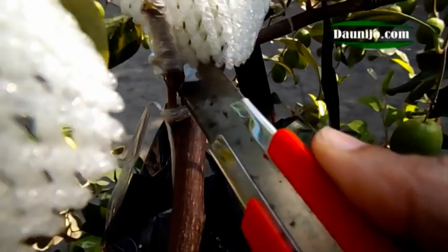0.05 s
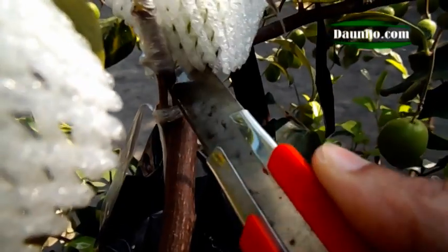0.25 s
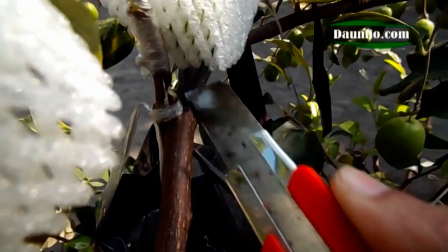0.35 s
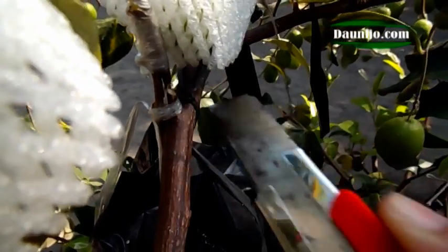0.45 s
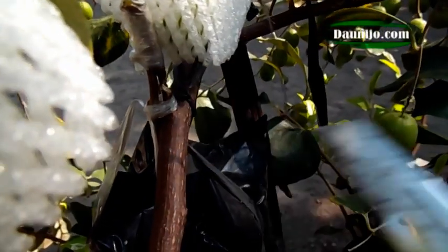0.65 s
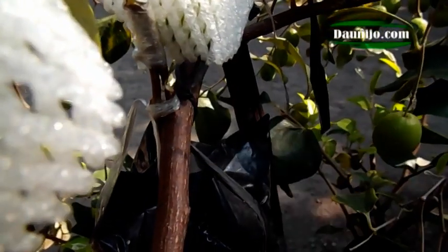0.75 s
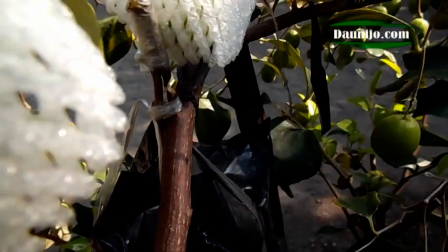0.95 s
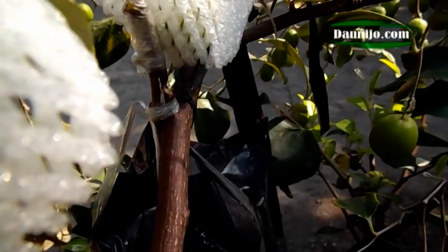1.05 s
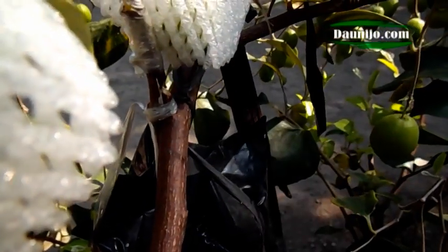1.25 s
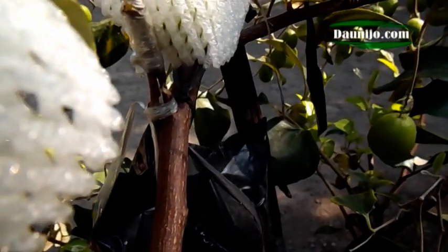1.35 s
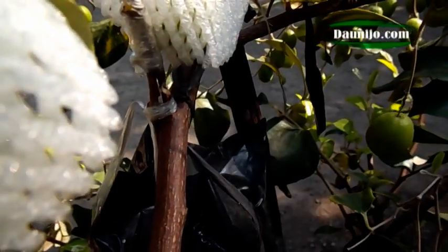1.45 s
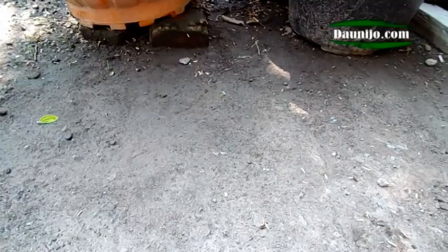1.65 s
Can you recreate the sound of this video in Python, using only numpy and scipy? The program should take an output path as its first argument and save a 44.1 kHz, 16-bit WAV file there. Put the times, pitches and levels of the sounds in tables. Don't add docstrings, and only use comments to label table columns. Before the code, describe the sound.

Pruning shears snip once through a woody stem, sharp metallic crunch, faint birds and leaves behind

```python
import sys
import numpy as np
from scipy import signal
from scipy.fft import rfft, irfft, next_fast_len
from scipy.io import wavfile
from scipy.ndimage import map_coordinates

SR = 44100
rng = np.random.default_rng(int(sys.argv[2]) if len(sys.argv) > 2 else 0)


def unload_audio(sound):
    columns = np.transpose(np.atleast_2d(sound))
    steps = np.round(np.clip(columns, -1, 1) * 32767)
    wavfile.write(sys.argv[1], SR, steps.astype(np.int16))


def rack_gain(trim_db):
    fader = np.asarray(trim_db, float)
    return 10 ** (fader / 20)


N = 74970


def unit(x):
    return x / np.sqrt(np.mean(x ** 2) + 1e-20)


def along(points, hz):
    f, v = np.transpose(points)
    return np.interp(np.log(hz + 1), np.log(f + 1), v)


def filtered(x, response):
    m = next_fast_len(x.shape[-1] + 4096)
    spectrum = rfft(x, m) * response(np.fft.rfftfreq(m, 1 / SR))
    return irfft(spectrum, m)[..., :x.shape[-1]]


def bell(centre_hz, octaves):
    return lambda hz: np.exp(-2 * (np.log2((hz + 1) / centre_hz) / octaves) ** 2)


def wobble(rate):
    knots = rng.standard_normal(int(N * rate / SR) + 4)
    return map_coordinates(knots, [np.arange(N) * rate / SR])


def window(start, length, edge):
    t = np.arange(N) / SR - start
    return np.clip(np.minimum(t, length - t) / edge + .5, 0, 1) ** 2


def echo(x, t60, count=1):
    t = np.arange(SR // 3) / SR
    tail = rng.standard_normal((count, len(t))) * rack_gain(-60 * t / t60) * (t > .002)
    return signal.fftconvolve(x[None], tail / np.linalg.norm(tail[0]), axes=1)[:, :N]


def hiss():
    # frequency in Hz, spectral level in dB per Hz.
    spectrum = [(15, -37), (25, -25), (496, -1), (569, -5.5), (652, -2.5), (858, -3.5), (1900, -8),
                (16100, -18.5), (17500, -21)]
    # frequency in Hz, left-right coherence from 0 to 1.
    alike = [(30, .78), (80, .95), (200, .995), (600, .999)]

    def response(hz):
        turn = np.arccos(np.clip(along(alike, hz), -1, 1)) / 2
        return rack_gain(along(spectrum, hz)) * np.array([np.cos(turn), np.sin(turn)])

    mid, side = filtered(rng.standard_normal((2, N)), response)
    level_db = -65 + .5 * wobble(6)
    return rack_gain(level_db) * unit(np.array([mid + side, mid - side]))


def leaves():
    # start in seconds, length in seconds, centre in Hz, width in octaves, level in dB.
    rustles = [(0, 0.035, 380, 1, -70), (0.0084, 0.16, 865, 0.96, -63.5), (0.175, .07, 680, 1.6, -65.5),
               (0.578, 0.12, 1050, 1.2, -69), (0.676, .11, 2480, 0.89, -68), (.86, .09, 870, 0.86, -73.5),
               (1.248, 0.047, 960, 0.93, -66.5), (1.3, 0.194, 800, 1.8, -69), (1.625, .12, 1300, 2.6, -66),
               (1.678, .08, 650, .8, -66), (1.672, .08, 1800, 1, -67), (1.623, .12, 7300, 2.9, -68),
               (0, 0.35, 10000, 3.6, -66.5), (0.062, 0.15, 2800, 1.7, -64.5), (.60, 0.09, 12800, .7, -72),
               (0.11, 0.11, 110, 0.5, -82)]
    # time in seconds, peak in dB, centre in Hz, width in octaves.
    ticks = [(.112, -55, 13500, .5), (.145, -57, 14500, .4), (.160, -60, 14500, .4), (.190, -60, 15000, .4),
             (.147, -55, 1500, 2), (.643, -54, 3000, 2), (.775, -60, 6000, 2), (.832, -58, 3000, 2),
             (1.256, -58, 1300, 2), (1.360, -49, 3300, 1.6), (1.361, -58, 9000, 1.5)]
    grains_per_s = 900
    out, t = np.zeros(N), np.arange(N) / SR
    for s, length, hz, octaves, db in rustles:
        noise = rng.standard_normal(N)
        struck = rng.random(N) < grains_per_s / SR
        grains = noise * (1 + 2.5 * struck * rng.exponential(1, N))
        level = rack_gain(db + 1.8 * wobble(40))
        out += level * window(s, length, .025) * unit(filtered(grains, bell(hz, octaves)))
    for s, db, hz, octaves in ticks:
        decay = (t > s) * np.exp(-np.abs(t - s) / .004)
        out += rack_gain(db) * decay * unit(filtered(rng.standard_normal(N), bell(hz, octaves))) / 2
    return out


def trilling():
    # start in seconds, length in seconds, low and high pitch in Hz, level in dB.
    calls = [
        (-.05, 0.07, 4300, 5100, -61),
        (.40, 0.038, 3940, 4490, -68),
        (0.441, 0.12, 3596, 4880, -66),
        (0.582, 0.085, 2970, 4587, -68),
        (0.945, 0.027, 3800, 5740, -68),
        (1.37, 0.15, 4000, 5850, -68),
        (1.385, .02, 4000, 4700, -66),
        (1.432, .02, 4450, 4750, -64),
        (1.475, .035, 4400, 4800, -66),
        (1.655, 0.05, 3800, 4000, -67),
    ]
    sweeps_per_s = 53
    out = np.zeros(N)
    for s, length, low_hz, high_hz, db in calls:
        cycles = np.cumsum(sweeps_per_s * (1 + .4 * wobble(30))) / SR + rng.random()
        sweep = np.abs(2 * (cycles % 1) - 1)
        tone = np.sin(2 * np.pi * np.cumsum(low_hz + (high_hz - low_hz) * sweep) / SR)
        out += rack_gain(db + 4.46 * wobble(59.6)) * window(s, length, 0.0049) * tone
    return out


def chirping():
    # time in seconds, pitch in Hz, level in dB.
    glide = [
        (.9845, 5200, -66),
        (.988, 4350, -52.5),
        (.993, 3640, -58),
        (1.0, 3400, -59),
        (1.006, 3810, -63),
        (1.011, 4600, -60),
        (1.014, 5070, -70),
    ]
    t = np.arange(N) / SR
    s, hz, db = np.transpose(glide)
    phase = 2 * np.pi * np.cumsum(np.interp(t, s, hz)) / SR
    return rack_gain(np.interp(t, s, db, -150, -150)) * np.sin(phase)


def cooing():
    # centre in seconds, pitch in Hz, peak in dB.
    puffs = [
        (1.14, 570, -72),
        (1.166, 564.4, -69.5),
        (1.228, 573, -65.5),
        (1.274, 573, -66),
        (1.331, 586, -58.5),
        (1.372, 590, -55),
        (1.417, 604, -58),
        (1.463, 594, -64.5),
        (.905, 1237, -66),
    ]
    t, puff_s = np.arange(N) / SR, 0.012
    out = np.zeros(N)
    for s, hz, db in puffs:
        out += rack_gain(db) * np.exp(-.5 * ((t - s) / puff_s) ** 2) * np.sin(2 * np.pi * hz * t)
    return out


def birds():
    grove_t60 = 0.2
    trills, chirp = trilling(), chirping()
    chirp = chirp + rack_gain(-9) * np.roll(chirp, round(.007 * SR))
    chirp = chirp + rack_gain(-4) * echo(chirp, grove_t60)[0]
    return rack_gain(-9) * trills + echo(trills, grove_t60)[0] + chirp + cooing()


def ring(scrape, modes, t60s, low_db):
    low_modes_hz, scatter_db = 2400, 2.5
    t = np.arange(SR // 8) / SR
    hz, db, t60 = np.column_stack([modes, t60s]).T[:, :, None]
    db = db + low_db * (hz < low_modes_hz) + scatter_db * rng.standard_normal(hz.shape)
    impulse = rack_gain(-60 * t / t60) * np.sin(2 * np.pi * hz * t)
    each = signal.fftconvolve(scrape[None], impulse, axes=1)
    return np.sum(rack_gain(db) * each / np.abs(each).max(axis=1, keepdims=True), axis=0)


def rattle(contacts, modes, t60s, crack_db):
    # frequency in Hz, crack level in dB.
    crack_spectrum = [(600, -54), (1100, -7.5), (2000, -7), (4000, 4.5), (7600, -5.5), (12000, 1),
                      (16500, -5.5), (18000, -29)]
    out, t = np.zeros(N + SR), np.arange(SR // 40) / SR
    for s, db, ms, bright_db, low_db in contacts:
        shape = np.exp(-(1000 * t / ms) ** 3) * (1 - np.exp(-t / .0002))
        tone = ring(shape * rng.standard_normal(len(t)), modes, t60s, low_db)
        noise = filtered(rng.standard_normal(len(t)), lambda hz: rack_gain(along(crack_spectrum, hz)))
        crack = shape * unit(noise)
        first = round(s * SR)
        out[first:][:len(tone)] += rack_gain(db) * tone / np.abs(tone).max()
        out[first:][:len(t)] += rack_gain(db + crack_db + bright_db) * crack / 2
    return out[:N]


def rings():
    # start in seconds, frequency in Hz, peak in dB, rise in seconds, T60 in seconds.
    lone_modes = [(.2476, 3907, -19, .0006, .045), (.2476, 4700, -19, .0005, .01),
                  (.2478, 6110, -23, .001, .035), (.2480, 7340, -29, .002, .04),
                  (.2475, 830, -39, .002, .03), (.2500, 1220, -32, .003, .04),
                  (.2602, 2120, -14, .0012, .012), (.2606, 5070, -14, .001, .010),
                  (.2606, 4000, -15, .001, .009), (.2678, 3950, -22, .001, .012),
                  (.2690, 2720, -37, .002, .05), (.2740, 5000, -33, .0015, .015),
                  (.2990, 6500, -50, .002, .03), (.3335, 6250, -36, .001, .009),
                  (.3335, 1250, -42, .001, .02), (.3382, 1586, -36, .002, .1),
                  (.3381, 4060, -19, .001, .012), (.3383, 5280, -24, .001, .016),
                  (.3442, 4000, -24, .001, .010), (.3450, 5000, -30, .001, .012),
                  (.3518, 3990, -20, .0016, .012), (.3518, 5050, -32, .001, .012),
                  (.3584, 4060, -28, .0012, .010), (.3638, 4100, -35, .0015, .012),
                  (.3690, 4250, -34, .001, .009)]
    out, t = np.zeros(N + SR), np.arange(SR // 5) / SR
    for s, hz, db, rise, t60 in lone_modes:
        swell = 1 - np.exp(-(t / rise) ** 2)
        out[round(s * SR):][:len(t)] += rack_gain(db - 60 * t / t60) * swell * np.sin(2 * np.pi * hz * t)
    return out[:N]


def shears():
    # start in seconds, end in seconds.
    squeeze = (.195, .245)
    # time in seconds, peak in dB, scrape length in ms,
    # crack over ring in dB, wood (low-mode) share in dB.
    cut = [(.2455, -27, 2.2, 0, -3), (.2475, -10, 1.2, -2, -8), (.2497, -14, 1.5, 1, -6),
           (.2520, -17, 2.5, -5, 0), (.2548, -16, 2, -3, -2), (.2570, -20, 2, 0, -2),
           (.2600, -18, 1.5, -1, 0), (.2612, -14, 1.1, 1, -3), (.2642, -19, 2.2, 4, -4),
           (.2675, -20, 2.2, 1, 1), (.2708, -28, 3, -2, 0), (.2740, -25, 2.5, -4, -2),
           (.2770, -31, 3, -3, 0), (.2808, -25, 2, 3, -2), (.2830, -29, 3, 4, -2), (.2870, -28, 4, 3, -3),
           (.2918, -33, 2, -5, -3), (.2960, -41, 4, -3, 0), (.3010, -40, 4, -4, -3),
           (.3065, -34, 2.5, 0, -3), (.3120, -42, 4, 0, 0)]
    # as for the cut, with the low-mode share in dB last.
    rebound = [(.3262, -49, 3, -4, -3), (.3306, -42, 1.5, -3, 3), (.3335, -45, 2.5, 3, 6),
               (.3380, -23, 2.0, -1, 0), (.3410, -31, 2, 9, 0), (.3428, -29, 1.5, 9, 0),
               (.3442, -24, 2, 2, 0), (.3470, -34, 2.5, 0, 0), (.3517, -31, 3, -1, 3),
               (.3583, -34, 2.2, -4, -3), (.3638, -39, 3, -6, -5), (.3665, -39, 2, -8, -5),
               (.3690, -39, 2, -6, -5)]
    # frequency in Hz, level in dB.
    closed = [(620, -55), (830, -14), (1219, -17), (1615, -24), (2143, -4), (2720, -4), (3400, -19),
              (3908, 6), (4648, 6.5), (5068, 1.5), (6090, 1.5), (7280, 0.5), (8500, -15), (11600, 2)]
    closed_t60 = [.02, .025, .025, .015, .012, .014, .012, .022, .014, .012, .014, .01, .008, .009]
    # frequency in Hz, level in dB.
    free = [(900, -26), (1099, -23), (1586, -21), (2258, -17), (2648, -1.5), (3499, -10), (3838, -3),
            (4080, 9.5), (4400, -5), (4700, -2), (5270, -29), (6014, -9), (8076, -11), (10610, -2.5)]
    free_t60 = [.025, .025, .085, .03, .03, .02, .012, .011, .009, .011, .013, .02, .015, .008]

    start, end = squeeze
    creep = unit(filtered(rng.standard_normal(N), bell(4200, 1.5))) * window(start, end - start, 0.0067)
    steel = rack_gain(-1.5) * rattle(cut, closed, closed_t60, crack_db=-0.5)
    steel = steel + rack_gain(3.5) * rattle(rebound, free, free_t60, crack_db=-5)
    no_bass = signal.butter(8, 820, "high", fs=SR, output="sos")
    t = np.arange(N) / SR - cut[1][0]
    swell = np.clip(t / 0.0024, 0, None) ** 2 * np.exp(-np.abs(t) / 0.0021)
    knock = rack_gain(-42) * swell * np.sin(2 * np.pi * 430 * t)
    return rack_gain(-63) * creep + knock + rings() + signal.sosfilt(no_bass, steel)


def scene():
    steel = shears()
    near, side = echo(steel, t60=.04, count=2)
    side = rack_gain(-31.5) * filtered(side, bell(6400, 1.16))
    far = echo(steel, t60=.3)
    tool = steel + rack_gain(-19) * near + rack_gain(-33) * far + side * [[1], [-1]]
    return tool + birds() + leaves() + hiss()


def band_limit(x):
    return signal.sosfilt(signal.butter(12, 18000, fs=SR, output="sos"), x)


def record(dry):
    mix = filtered(dry, lambda hz: np.clip((18000 - hz) / 900, 0, 1))
    return band_limit(mix)


dry = scene()
out = record(dry)
unload_audio(out)
```